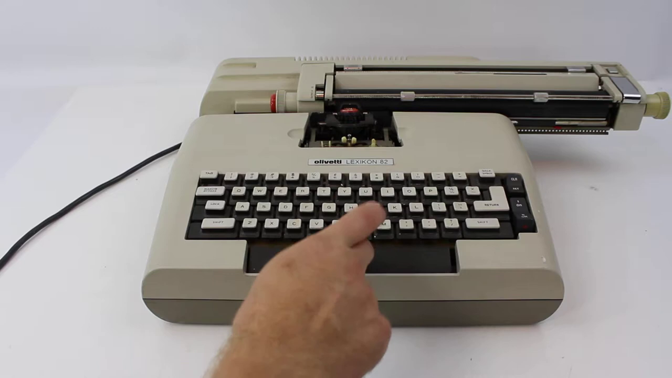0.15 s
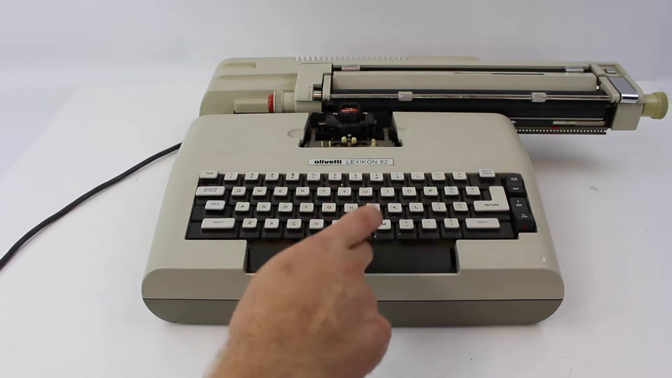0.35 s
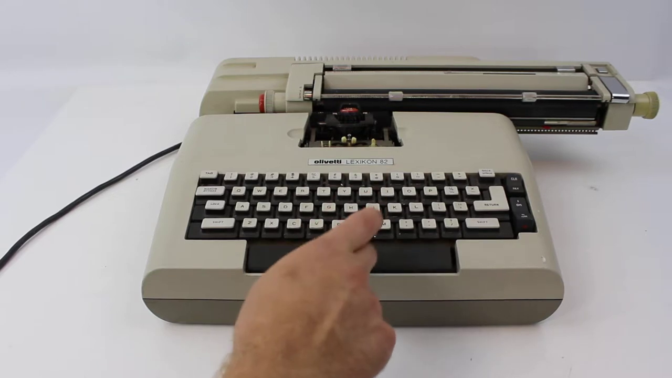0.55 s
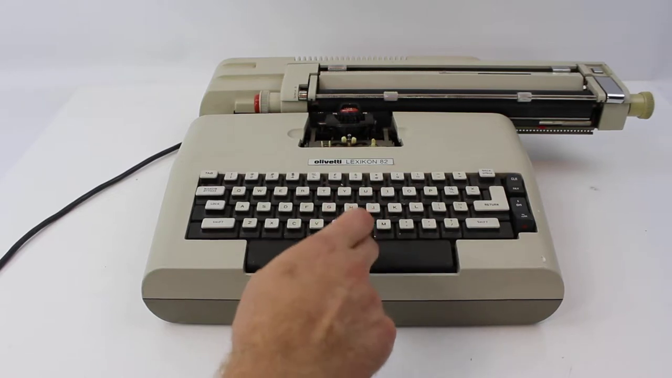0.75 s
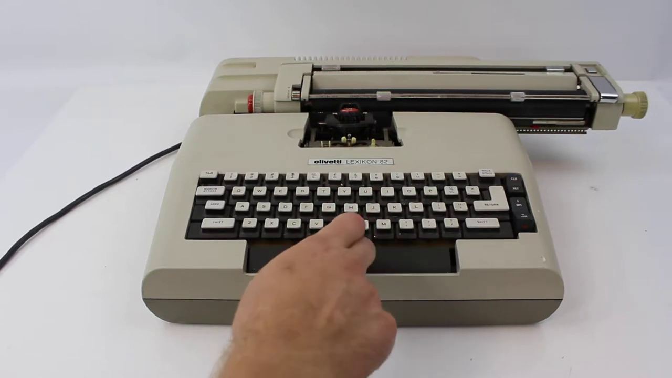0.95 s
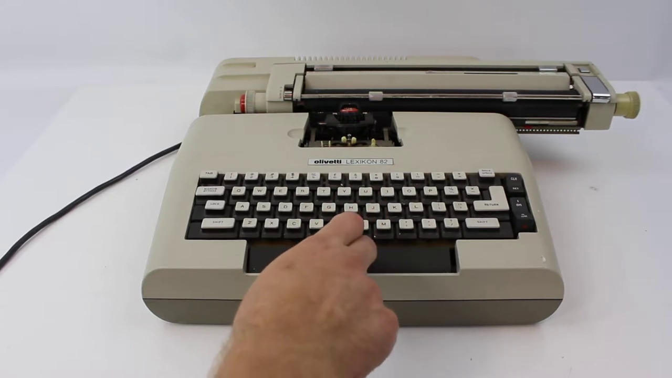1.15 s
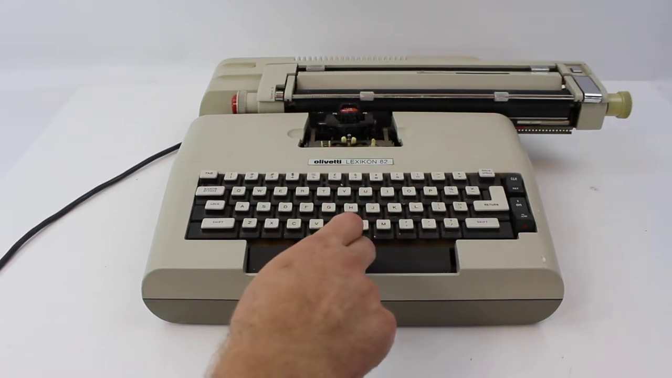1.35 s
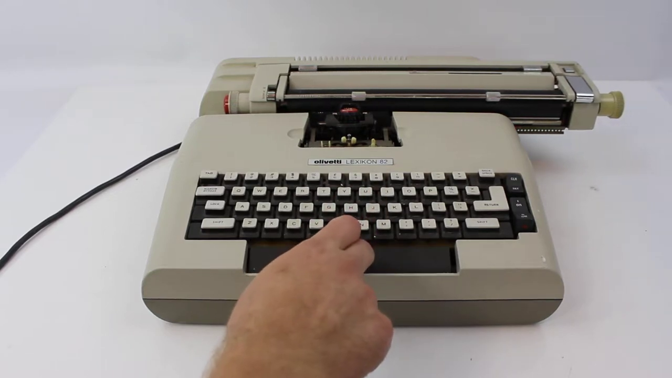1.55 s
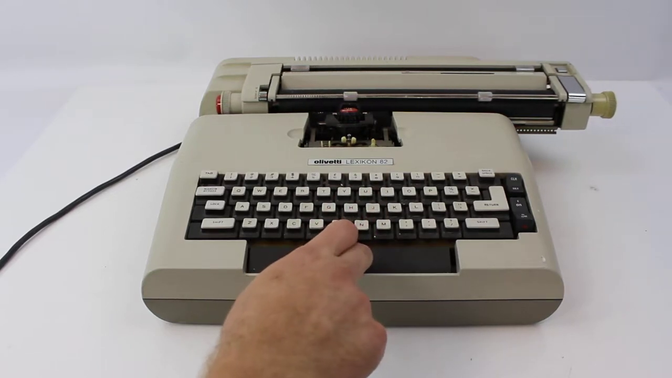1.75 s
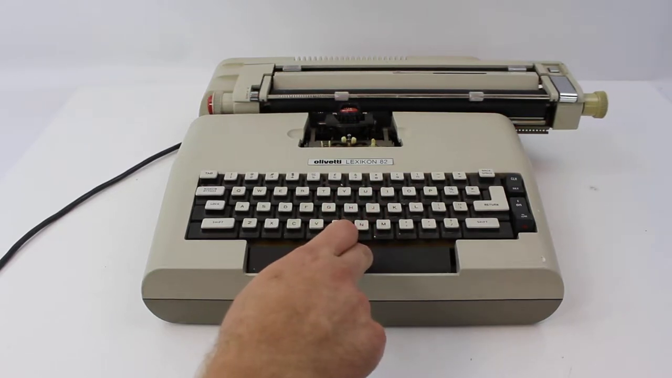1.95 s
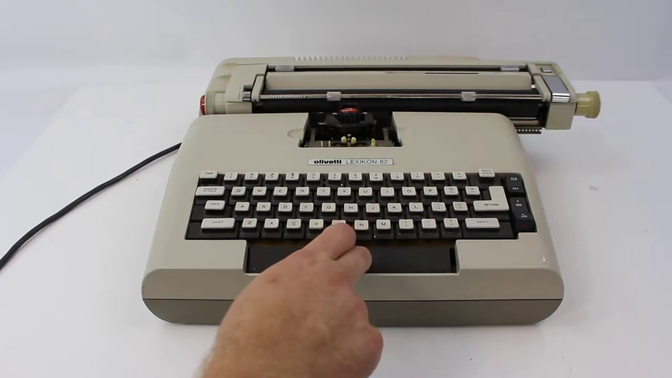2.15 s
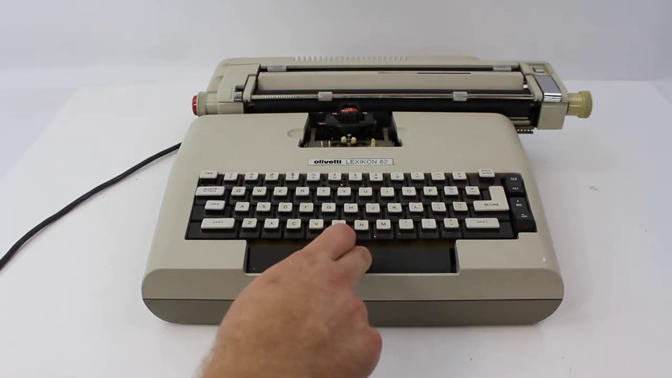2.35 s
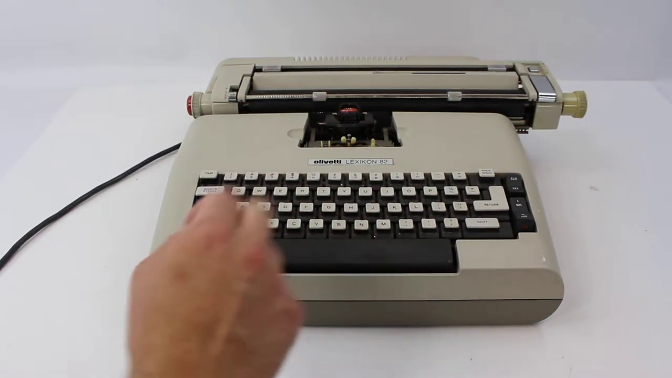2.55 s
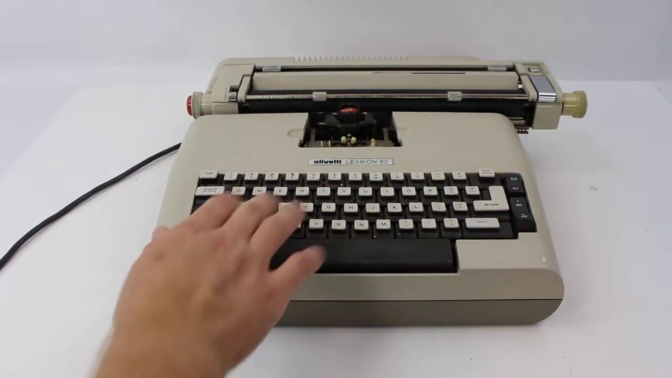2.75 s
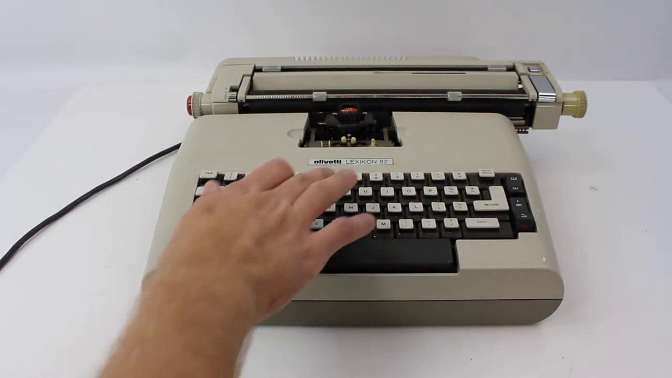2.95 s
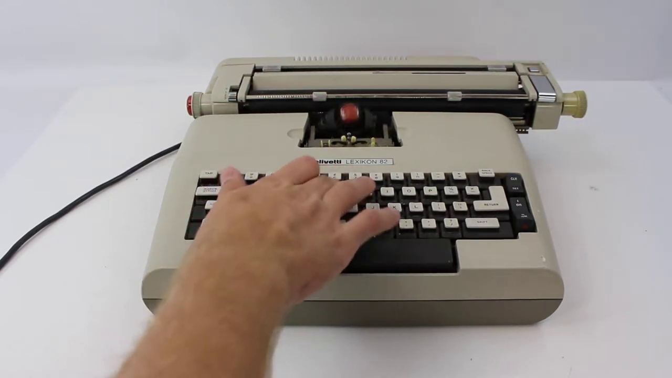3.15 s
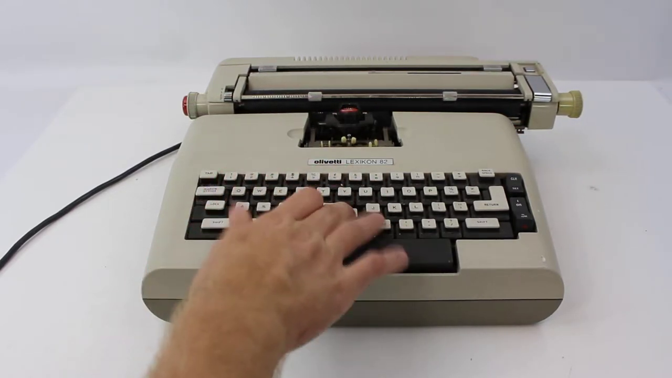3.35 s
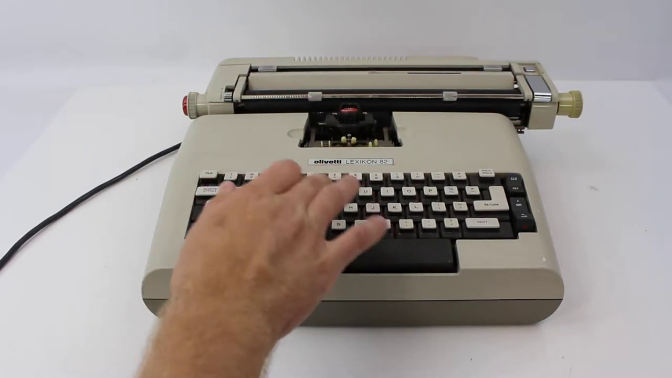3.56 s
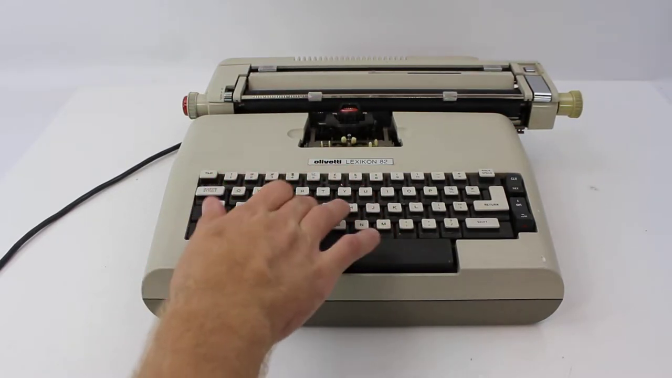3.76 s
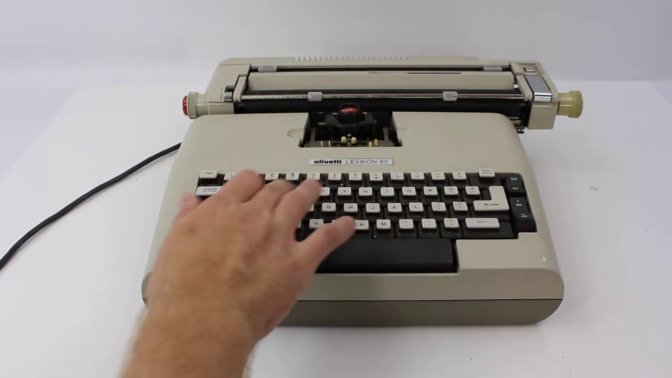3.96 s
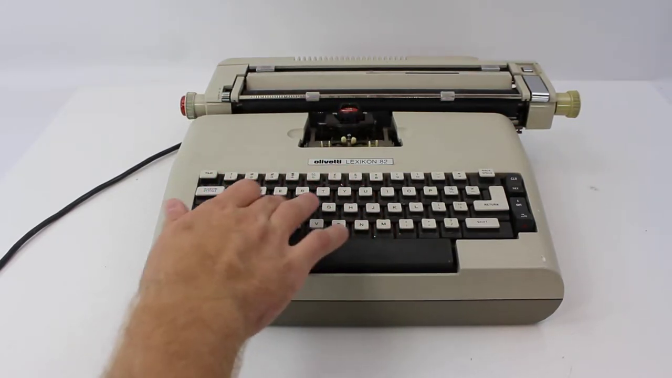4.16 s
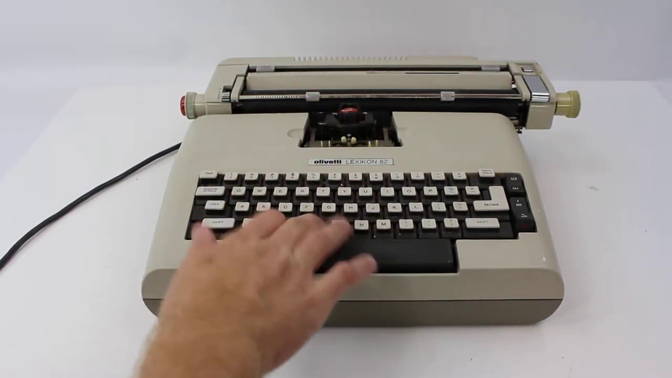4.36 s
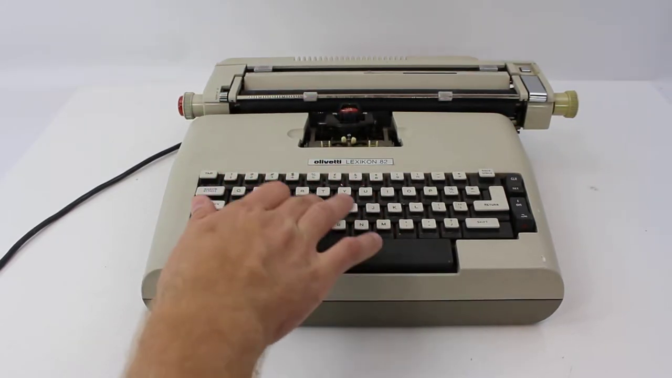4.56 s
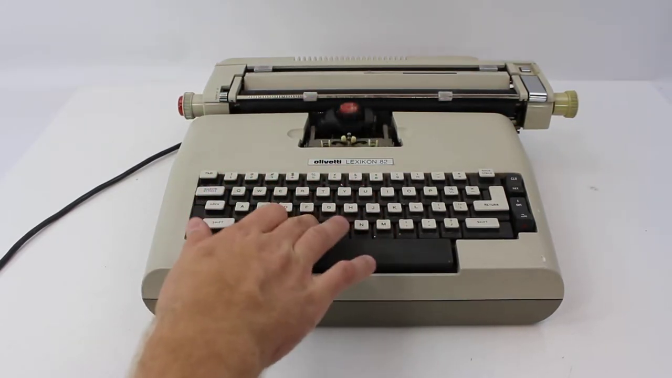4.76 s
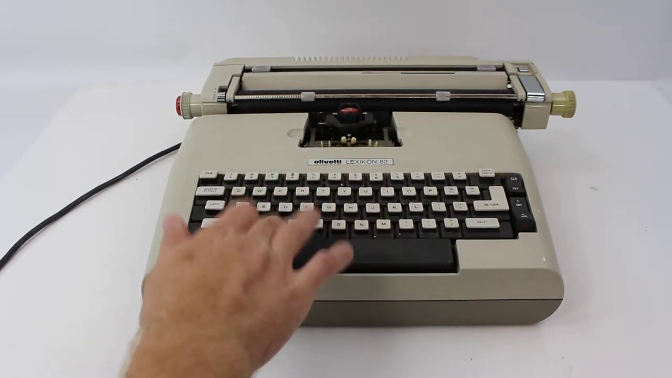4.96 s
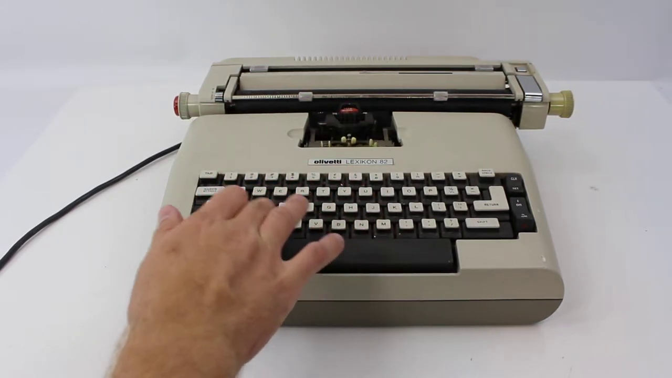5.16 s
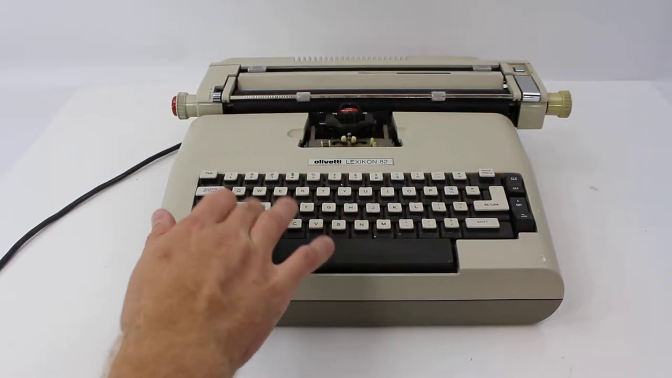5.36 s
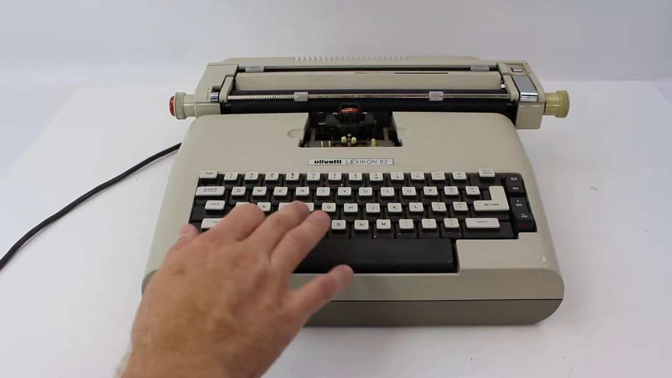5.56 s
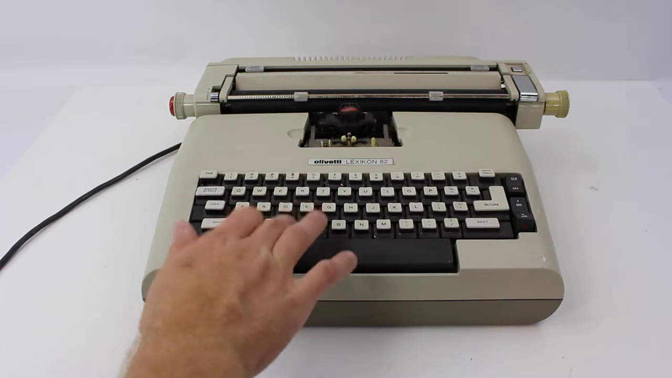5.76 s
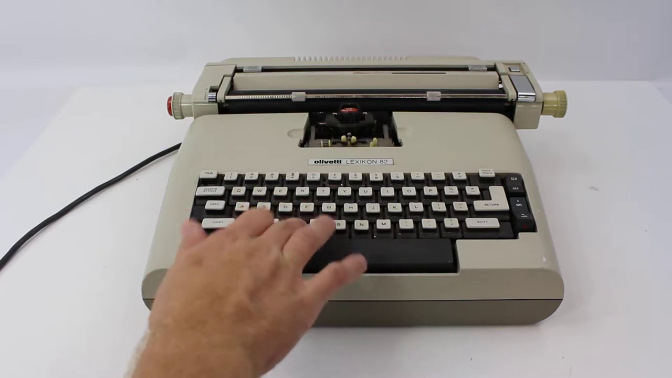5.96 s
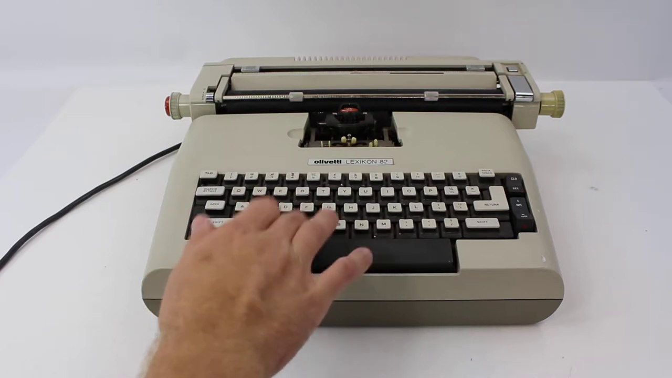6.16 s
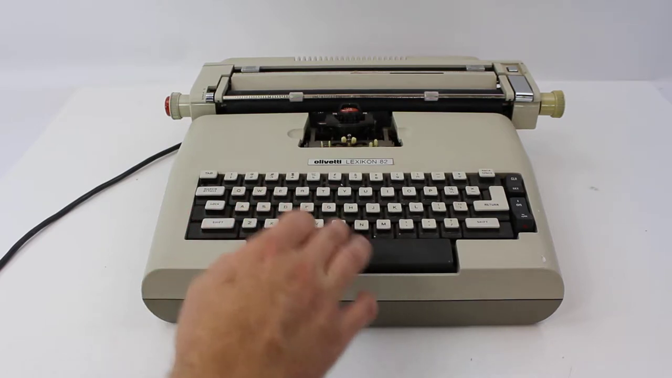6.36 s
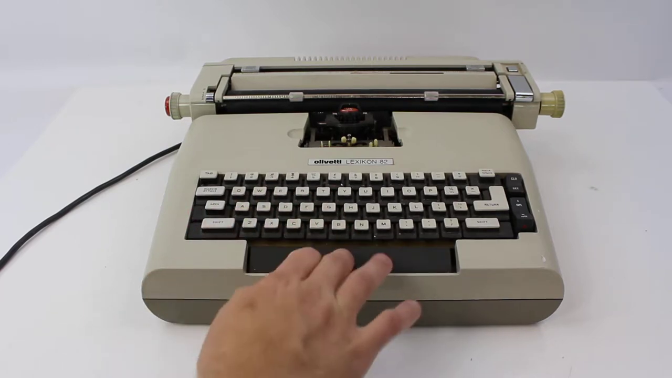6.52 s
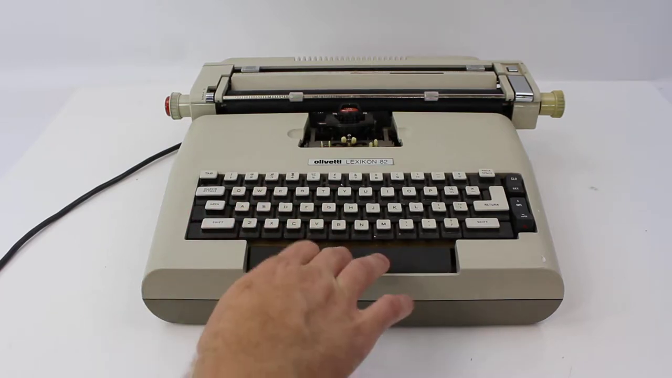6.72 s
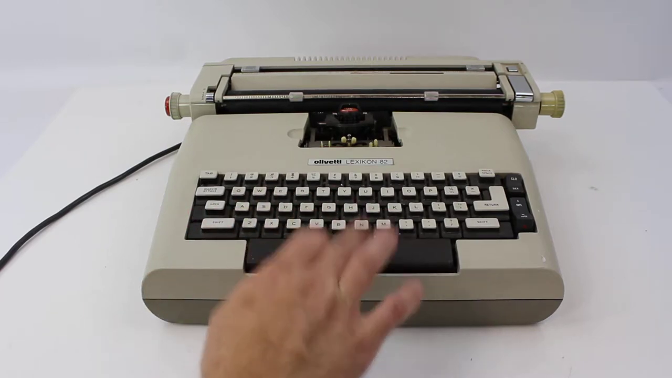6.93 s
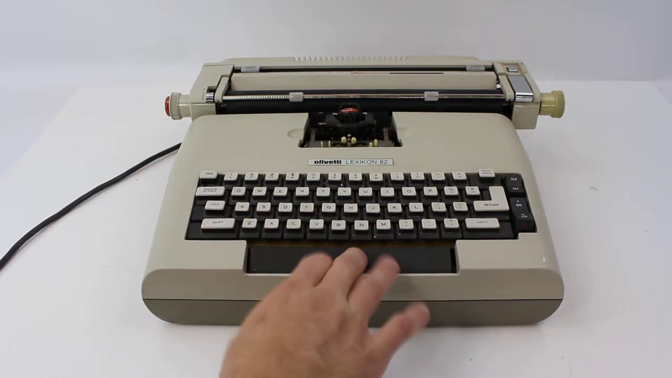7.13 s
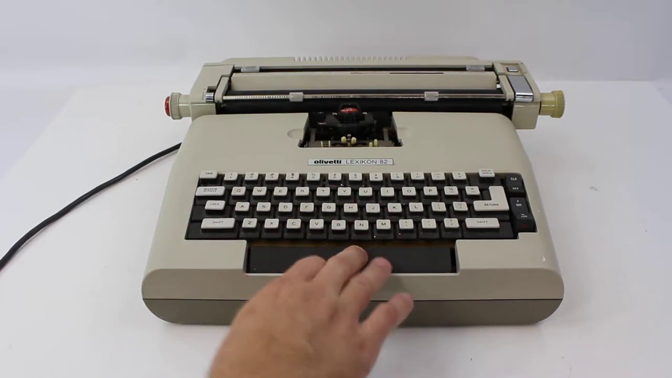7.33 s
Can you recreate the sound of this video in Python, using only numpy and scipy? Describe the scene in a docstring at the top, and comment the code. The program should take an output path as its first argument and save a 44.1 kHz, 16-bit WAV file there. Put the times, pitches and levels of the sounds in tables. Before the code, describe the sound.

An electric typewriter hums steadily while its carriage ratchets along in a fast metallic chatter, then single keys strike with sharp clacks and soft space bar thumps.

```python
"""On a desk in a room, an electric typewriter with the microphone close to it. Its motor hums and knocks once
a shaft turn; the held space bar lets the carriage ratchet along, then keys are struck. Every kind of stroke
runs its own fixed cycle of steel contacts, made of noise bursts through resonances, over a rattle of linkage;
the blows ring the plastic case and thump the desk. Faint paired ticks of a pawl come late."""
import sys
import numpy as np
from scipy import signal
from scipy.fft import rfft, irfft, next_fast_len
from scipy.io import wavfile
from scipy.ndimage import uniform_filter1d, map_coordinates

SR = 44100
rng = np.random.default_rng(int(sys.argv[2]) if len(sys.argv) > 2 else 0)


def voltage_ratio(level):
    """Linear amplitude factor for a level in decibels (scalar or array-like)."""
    return 10 ** (np.asarray(level, float) / 20)


def wrap_up_sound(samples):
    """Save the sound to the file named by the first command line argument, as 16-bit audio."""
    columns = np.atleast_2d(samples).T
    # keep every value between -1 and 1, then stretch to whole-number steps
    tamed = np.clip(columns, -1, 1)
    steps = np.round(tamed * 32767).astype(np.int16)
    wavfile.write(sys.argv[1], SR, steps)


N = 325899
T = np.arange(N) / SR  # time [s]
TURN_S = .1579  # one turn of the drive shaft
TOOTH_HZ, HELD_S = 17.796, .9035  # repeat rate of the held space bar, first tooth of its run
PAWL_S, PAWL_ECHO_S, PAWL_ECHO_DB = 6.307, .025, -1.5  # first tick, second tick of each pair
FALL_GROWS = 1.6  # dB of rattle per dB of landing: the rattle swings wider
FALL_KNOCK_DB, FALL_DULL_DB, FALL_BRIGHTENS = -14, -12, .8  # a softer landing is brighter, in dB per dB
BRIGHTEST_DB = 7  # limit to a landing's brightness
SLIDE_CASE_DB, SLIDE_DESK_DB = -2.5, -18  # over the rattle

# Resonances of the pawl: (frequency [Hz], width [Hz], level [dB])
PAWL_MODES = [(3650, 105, 2.5), (4645, 440, -2.5), (5940, 6400, -17)]
# Resonances of the plastic case: (frequency [Hz], width [Hz], level [dB])
CASE_MODES = [(371, 74, -2), (607.6, 56.5, -0.5), (700, 35.2, 0.5), (990, 183, -5), (1347, 135, -6),
              (1629, 91, -7.5)]
# Resonances of the levers: (frequency [Hz], width [Hz], level [dB])
LEVER_MODES = [(2250, 1500, -0.5), (2575, 450, 4.5), (3020, 405, -2), (4266, 1200, -1)]
# Resonances of the carriage rack: (frequency [Hz], width [Hz], level [dB])
RACK_MODES = [(5300, 600, -3), (6556, 750, -4), (7370, 590, -3), (8220, 1170, -6.5), (10240, 1610, -7),
              (12740, 2900, -23)]
# Resonance of the escapement wheel: (frequency [Hz], width [Hz], level [dB])
WHEEL_MODES = [(5330, 160, 0)]
# Resonances of the desk top: (frequency [Hz], width [Hz], level [dB])
DESK_MODES = [(79.7, 47, -3), (131.3, 47, 1), (195.5, 81, -1.5)]
# Spectrum shape of the motor's whirr: (frequency [Hz], relative density [dB])
MOTOR_SPECTRUM = [(20, -38), (120, -22.5), (280, -25.5), (390, -14.5), (700, -19), (870, -25),
                  (1020, -21.5), (2100, -32), (2330, -32), (2480, -28.5), (2640, -33), (10500, -53),
                  (15500, -90)]
# The shaft's bump, its bounces and a softer one later: (time into the turn [s], relative level [dB])
SHAFT_BUMPS = [(0, -2.5), (.019, -2), (.039, -7.5), (.115, -9.5)]

# The carriage slides: (time [s], length [s], rattle level [dB])
SLIDES = [(0, .036, -26), (.236, .05, -22), (.428, .245, -24), (.777, .055, -23.5)]
# The jerking carriage drums on the desk: (multiple of the tooth rate, level [dB])
CARRIAGE_DRUM = [(4, -43.5), (5, -60), (6, -47.5), (8, -50), (10, -45.5)]
# The escapement catching teeth: (time [s], level [dB])
TEETH_LEVEL = [(.9, -13.5), (1.3, -11), (1.85, -9.5), (2.45, -10.5)]
# Three cam lobes take turns: (level over the tooth [dB])
LOBES_DB = [-.7, 1.8, -.6]
# Rattle under the held run: (time after its first tooth [s], length [s], rattle, case, desk level [dB])
HELD_RATTLE = (-.04, 1.576, -34, -33, -45)
# Loudness of the pawl's ticks: (time [s], level [dB])
PAWL_LEVEL = [(6.3, -33), (6.55, -30), (6.95, -24)]

# Letter keys: (clutch trips [s], rattle level [dB], cam blow level [dB], delay of the type hitting the platen [s],
# delay of the type bar falling back [s], fall level [dB]); both delays count from the trip
LETTERS = [(3.101, -18, -8, .099, .178, -7), (4.0441, -18.5, -11.5, .102, .225, -30),
           (4.3748, -25, -9, .093, .191, -19), (4.6925, -26, -9.5, .1015, .1825, -22),
           (4.9934, -22, -14, .098, .18, -36), (5.2608, -24.5, -17, .098, .175, -12),
           (5.7168, -26, -14, .092, .18, -40), (5.9333, -25, -16, .101, .18, -21)]
# The click that starts a letter: (level over the rattle [dB], case knock [dB], brightness [dB])
LETTER_TRIP = (-3.5, -12, 12)
# Cam blows: (time after the trip [s], level over the cam blows [dB], case knock [dB], brightness [dB])
LETTER_CAMS = [(.033, -2.5, 2, 0), (.063, 0, -5, 5)]
# The hit and its rebound: (time after the hit [s], level [dB], case knock [dB], brightness [dB])
TYPE_HITS = [(0, -4.5, -12, 1.5), (.016, -12, -6, 3)]
# Letter rattle: (time after the trip [s], time kept after the hit [s], rattle, case, desk over the rattle [dB])
LETTER_RATTLE = (.001, .01, 0, -6, -9.5)
# Rattle around the hit: (time after it [s], length [s], rattle, case, desk level [dB])
HIT_RATTLE = (-.014, .047, -21.5, -31, -36)
# Rattle around the fall: (time after it [s], length [s], rattle, case, desk over the grown fall level [dB])
FALL_RATTLE = (-.012, .045, -5.5, -13, -24)

# Every cycle below holds three parts:
#   contacts: (time after the event [s], level over it [dB], case knock [dB], brightness [dB])
#   rattle: (time after the event [s], length [s], rattle, case, desk over it [dB])
#   ringing: (time after the event [s], frequency [Hz], level over its ringing [dB])
# The space bar hits its stop: (time [s], level [dB], ringing level [dB])
BAR_DOWN = [(.1615, -3, -10.5), (.3267, -3.5, -8), (.5376, -9.5, -15.5), (.7027, -11.5, -13),
            (.8745, -9, -24), (6.195, -15, -26), (6.4953, -11, -21.5), (6.996, -6, -25), (7.164, -14, -25),
            (7.3165, -8, -22)]
# Its cycle: (contacts, rattle, ringing)
BAR_DOWN_CYCLE = ([(-.012, -18, 9, 3), (0, 0, -10, 5.5)], (-.013, .02, -26, -22, -32), [(.005, 700, -1.5)])
# The space bar springs back: (time [s], level [dB], ringing level [dB])
BAR_UP = [(6.812, -17, -22), (7.0698, -22, -21), (7.2517, -19.5, -23)]
# Its cycle: (contacts, rattle, ringing)
BAR_UP_CYCLE = ([(0, 0, -4, 5), (.028, 1, -5, 8)], (0, .055, -11, -12, -24), [(0, 2050, -1),
                 (.034, 1345, -1)])
# The carriage moves on by single teeth: (time [s], level [dB])
STEPS = [(.23, -15.5), (.3974, -13), (.4547, -9), (.5105, -14.5), (.5658, -14), (.6234, -11.5), (.735, -16),
         (.7945, -12.5)]
# Its cycle: (contacts, rattle, ringing)
STEP_CYCLE = ([(0, 0, -22, 10)], (0, .02, -20, -22, -34), [])
# A key goes down without printing: (time [s], level [dB])
TOUCHES = [(3.3836, -20), (3.7156, -15), (6.1248, -23)]
# Its cycle: (contacts, rattle, ringing)
TOUCH_CYCLE = ([(0, 0, -8, 5), (.025, -1, -3, 4)], (-.004, .052, -9, -13, -27), [])
# The heavy basket drops and bounces: (time [s], level [dB])
SHIFTS = [(3.5064, -10), (3.824, -8)]
# Its cycle: (contacts, rattle, ringing)
SHIFT_CYCLE = ([(-.015, -8, -4, 2), (0, 0, -3, 2), (.028, -2, -10, -3), (.065, -13, -2, 4)],
                (-.015, .052, -16, -13, -26), [])
# The carriage reaches its margin: (time [s], level [dB], ringing level [dB])
STOP = [(2.4775, -11.5, -16)]
# Its cycle: (contacts, rattle, ringing)
STOP_CYCLE = ([(0, 0, -12.5, 6), (.017, -1.5, -26, 2)], (-.031, .083, -14.5, -15, -27), [(.008, 1600, 0)])


def unit(x):
    """Scale to rms 1."""
    return x / np.sqrt(np.mean(x ** 2) + 1e-20)


def noise():
    """Fresh white noise."""
    return rng.standard_normal(N)


def wobble(rate):
    """A smooth random curve, rate knots a second."""
    knots = rng.standard_normal(int(N * rate / SR) + 4)
    return map_coordinates(knots, [T * rate])


def spikes(s, gains):
    """One sample of each gain at each time."""
    return np.bincount(np.round(s * SR).astype(int), gains, N + SR)[:N]


def filtered(x, response):
    """x times a complex response of frequency."""
    m = next_fast_len(N + 8192)
    return irfft(rfft(x, m) * response(np.fft.rfftfreq(m, 1 / SR) + 1), m)[:N]


def ring(x, modes, order=1):
    """x through a body's resonances, alternating in sign; white noise keeps its rms."""
    def response(f):
        h = 0
        for k, (hz, width, db) in enumerate(modes):
            damping = 1j * f * width
            h = h + (-1) ** k * voltage_ratio(db) * damping / (hz * hz - f * f + damping)
        return h ** order / np.sqrt(np.mean(abs(h) ** (2 * order)))
    return filtered(x, response)


def fade(x, t60):
    """Every sample of x leaves a tail that dies 60 dB in t60 seconds."""
    return signal.lfilter([1], [1, -voltage_ratio(-60 / (t60 * SR))], x)


def bursts(s, db, crack_t60, tail_t60, tail_db, lead_db=-60):
    """Noise bursts: a rush of parts leading in, a short crack and the uneven chatter of the parts settling."""
    kicks = spikes(s, voltage_ratio(db))
    lead = voltage_ratio(lead_db) * fade(kicks[::-1], 0.036)[::-1]  # a tail run backwards
    chatter = voltage_ratio(tail_db + 2.24 * wobble(180)) * fade(kicks, tail_t60)
    crack_db = db + 0.56 * (db - np.max(db))  # weaker blows are blunter
    crack = fade(spikes(s, voltage_ratio(crack_db)), crack_t60)
    return (lead + crack + chatter) * noise()


def motor():
    """Belt and bearings whirr as shaped noise; the shaft knocks the case once a turn."""
    hz, db = np.transpose(MOTOR_SPECTRUM)
    spectrum = lambda f: voltage_ratio(np.interp(np.log(f), np.log(hz), db))
    whirr = filtered(voltage_ratio(0.88 * wobble(50)) * noise(), spectrum)
    turns = np.arange(2.672 % TURN_S, T[-1], TURN_S)[:, None]
    late, bump_db = np.transpose(SHAFT_BUMPS)
    chance = rng.standard_normal((len(turns), len(late), 2))
    bump_s = turns + late + 0.00197 * chance[..., 0]
    bump_gains = voltage_ratio(bump_db + 2 * chance[..., 1])
    bumps = spikes(bump_s.ravel(), bump_gains.ravel())
    knock = ring(bumps, [(375, 88, 0), (624, 78, -5.5)], order=2)
    return voltage_ratio(-38.5) * unit(whirr) + voltage_ratio(-40) * unit(knock)


def engaged(strokes, db, release_t60, swell_t60=0.0045):
    """Level of a layer that swells in with each stroke and dies away after it."""
    level = sum(voltage_ratio(g) * ((T >= s) & (T < s + length)) for (s, length, *_), g in zip(strokes, db))
    lagged = lambda t60: fade(level, t60) * (1 - voltage_ratio(-60 / (t60 * SR)))
    return np.maximum(lagged(swell_t60), lagged(release_t60))


def linkage(strokes):
    """While the clutch is in, cams and levers rattle in dense small contacts: grainy noise through the bodies."""
    _, _, rattle_db, case_db, desk_db = np.transpose(strokes)
    grain = voltage_ratio(3 * wobble(250) + 3 * wobble(70))
    rattle = engaged(strokes, rattle_db, 0.19) * unit(grain * noise())
    steel = voltage_ratio(-4) * ring(rattle, RACK_MODES) + voltage_ratio(-5) * ring(rattle, LEVER_MODES)
    case_grain = unit(voltage_ratio(2.3 * wobble(45)) * noise())
    case = ring(engaged(strokes, case_db - 1.5, 0.24, 0.053) * case_grain, CASE_MODES)
    desk = ring(engaged(strokes, desk_db + 0.5, 0.45) * noise(), DESK_MODES, order=2)
    return steel + case + desk


def room(x):
    """A short diffuse tail of fading noise, 300 samples behind the machine, the treble dying first."""
    hz, t, z = signal.stft(rng.standard_normal(SR // 3), SR, nperseg=256)
    t60 = 0.18 / (1 + hz / 9000)
    tail = signal.istft(z * voltage_ratio(-60 * t / t60[:, None]), SR, nperseg=256)[1]
    return signal.fftconvolve(np.pad(x, (300, 0)), tail / np.linalg.norm(tail))[:N]


def clinks(s, db, count):
    """Each blow strikes different parts: a few of the machine's resonances ring briefly."""
    modes = np.array(LEVER_MODES + RACK_MODES + CASE_MODES[3:])
    t, out = T[:SR // 12], np.zeros(N + SR)
    for start, level, draw in zip(s, db, rng.random((len(s), count, 3))):
        picked = (draw[:, 0] * len(modes)).astype(int)
        hz, width, mode_db = modes[picked].T[..., None]
        decay = voltage_ratio(mode_db - 17 * draw[:, 1:2] - 60 * t / 0.073)
        tones = decay * np.sin(2 * np.pi * (hz + width * (draw[:, 2:] - .5)) * t)
        out[round(start * SR):][:len(t)] += voltage_ratio(level) * (1 - np.exp(-t / 0.0037)) * tones.sum(axis=0)
    return out[:N]


def blows(hits):
    """Bright blows ring the rack, dull ones the levers; all knock the case and thump the desk."""
    s, db, knock_db, bright_db = np.transpose(hits)
    high = ring(bursts(s, db + bright_db / 2 - 5, 0.0081, 0.073, -2, lead_db=-12), RACK_MODES)
    mid = ring(bursts(s, db - bright_db / 2 - 5.5, 0.0038, 0.11, -3, lead_db=-6.5), LEVER_MODES)
    case = ring(bursts(s, db + knock_db - 5.5, 0.074, 0.22, -7, lead_db=0), CASE_MODES)
    thump = ring(spikes(s, voltage_ratio(db + knock_db + 9)), DESK_MODES, order=2)
    return high + mid + case + thump + clinks(s, db - 9, count=3)


def rings(tones):
    """One slightly rough mode each: a sine with drifting phase, swelling for a few ms and soon damped."""
    out, t = np.zeros(N + SR), T[:SR // 8]
    for s, hz, db in tones:
        u = t / (0.0025 + 6 / hz)
        swell = (u * np.exp(1 - u)) ** 2
        rough = hz / 14000 * np.cumsum(rng.standard_normal(len(t)))
        out[round(s * SR):][:len(t)] += voltage_ratio(db + 1) * swell * np.sin(2 * np.pi * hz * t + rough)
    return out[:N]


def ratchet():
    """Each tooth cracks on the rack and jolts the levers more or less; the jerking carriage drums on the desk."""
    tooth = np.arange(28)
    s = HELD_S + tooth / TOOTH_HZ
    lobe_db = np.take(LOBES_DB, tooth, mode="wrap")
    db = np.interp(s, *np.transpose(TEETH_LEVEL)) + lobe_db + rng.normal(0, .8, len(s))
    high = ring(bursts(s, db - 6.5, 0.039, 0.085, -7), RACK_MODES)
    wheel = ring(bursts(s, db - 15, 0.03, 0.1, -6), WHEEL_MODES)
    mid = ring(bursts(s, db - 17 + rng.normal(0, 2.5, len(s)), 0.076, 0.13, -7), LEVER_MODES)
    # the pawl lets go in between
    release = ring(bursts(s + 0.62 / TOOTH_HZ, db - 24, 0.09, 0.13, 4), LEVER_MODES + RACK_MODES)
    drum = np.zeros(N)
    for multiple, level in CARRIAGE_DRUM:
        tone = np.sin(2 * np.pi * (multiple * TOOTH_HZ * T + rng.random()))
        drum += voltage_ratio(level + 1.5 * wobble(3)) * tone
    drum *= np.interp(T, [.95, 1.25, 2.5, 2.58], [0, 1, 1, 0])
    return high + wheel + mid + release + clinks(s, db - 12, count=3) + drum


def pawl():
    """Faint thin ticks in pairs, twice a shaft turn: short bursts through the pawl, case and levers."""
    first = PAWL_S + np.arange(9) * TURN_S / 2
    s = np.r_[first, first + PAWL_ECHO_S]
    db = np.repeat([0, PAWL_ECHO_DB], len(first))
    db = db + np.interp(s, *np.transpose(PAWL_LEVEL)) + rng.normal(0, 2, len(s))
    tick = ring(bursts(s, db - 10.5, 0.017, 0.069, -2), PAWL_MODES)
    low = ring(bursts(s, db, 0.063, 0.11, -27), CASE_MODES[:2])
    middle = ring(bursts(s, db - 19, 0.03, 0.12, -4), CASE_MODES[3:] + LEVER_MODES[:1])
    return tick + low + middle


def cycles():
    """Lay each kind's cycle on its events: rows of blows, of rattling strokes and of ringing parts."""
    hits, strokes, tones = [], [(HELD_S + HELD_RATTLE[0], *HELD_RATTLE[1:])], []
    strokes += [(s, length, db, db + SLIDE_CASE_DB, db + SLIDE_DESK_DB) for s, length, db in SLIDES]
    place = lambda s, db, row: (s + row[0], row[1], *np.add(db, row[2:]))
    kinds = [(BAR_DOWN, BAR_DOWN_CYCLE), (BAR_UP, BAR_UP_CYCLE), (STEPS, STEP_CYCLE),
             (TOUCHES, TOUCH_CYCLE), (SHIFTS, SHIFT_CYCLE), (STOP, STOP_CYCLE)]
    for events, (contacts, rattle, ringing) in kinds:
        for s, db, *ring_db in events:
            hits += [(s + late, db + over, knock, bright) for late, over, knock, bright in contacts]
            strokes += [place(s, db, rattle)]
            tones += [place(s, *ring_db, tone) for tone in ringing]
    for s, effort, cams, flight, back, fall in LETTERS:
        hits += [(s, effort + LETTER_TRIP[0], *LETTER_TRIP[1:])]
        hits += [(s + late, cams + over, knock, bright) for late, over, knock, bright in LETTER_CAMS]
        hits += [(s + flight + late, *rest) for late, *rest in TYPE_HITS]
        fall_bright = min(FALL_DULL_DB - FALL_BRIGHTENS * fall, BRIGHTEST_DB)
        hits += [(s + back, fall, FALL_KNOCK_DB, fall_bright)]
        late, kept, *levels = LETTER_RATTLE
        strokes += [place(s, effort, (late, flight + kept, *levels))]
        strokes += [place(s + flight, 0, HIT_RATTLE)]
        strokes += [place(s + back, FALL_GROWS * fall, FALL_RATTLE)]
    return hits, strokes, tones


def scene():
    """The machine close by, the room around it and the motor running throughout."""
    hits, strokes, tones = cycles()
    machine = linkage(strokes) + blows(hits) + rings(tones) + ratchet() + pawl()
    return (motor() + machine + voltage_ratio(-14) * room(machine))[None]


def low_pass(x):
    """Removes everything above the highest recorded frequency."""
    return signal.sosfilt(signal.butter(12, 15690, fs=SR, output="sos"), x)


def record(dry):
    """Gain control ducks around loud strokes and climbs back slowly; the loudest blows clip softly."""
    level_db = 10 * np.log10(abs(uniform_filter1d(dry ** 2, SR // 20)) + 1e-9)
    held_db = np.maximum.accumulate(level_db + 30 * T, axis=1) - 30 * T  # falls at 30 dB a second
    gain_db = -.35 * uniform_filter1d(held_db + 18.5, SR // 20)
    levelled = dry * voltage_ratio(gain_db)
    clipped = levelled / (1 + abs(levelled) ** 8) ** (1 / 8)
    return low_pass(clipped)


dry = scene()
out = record(dry)
wrap_up_sound(out)
```